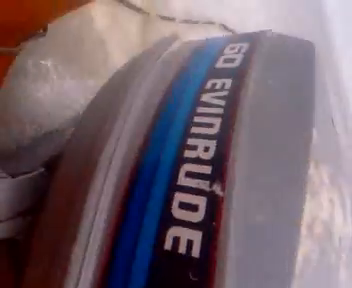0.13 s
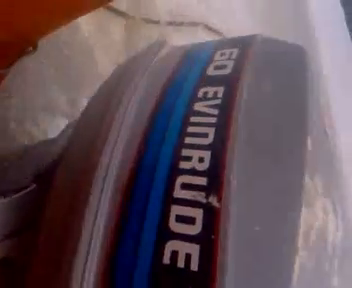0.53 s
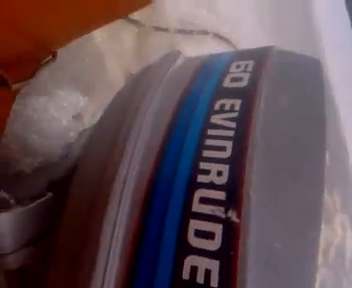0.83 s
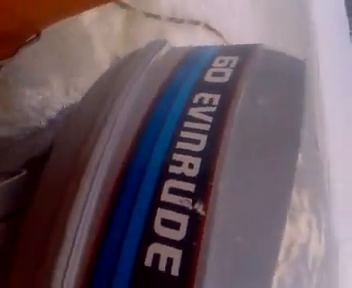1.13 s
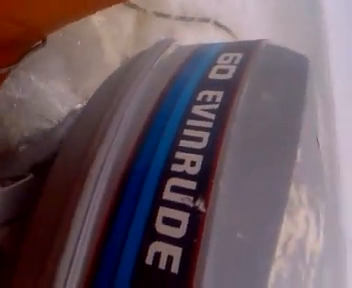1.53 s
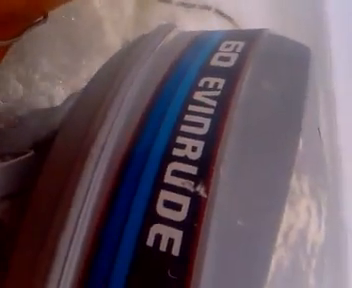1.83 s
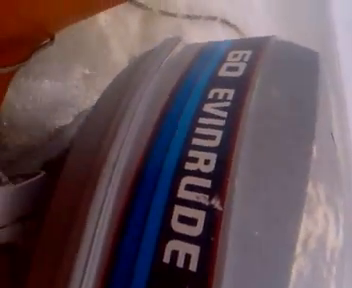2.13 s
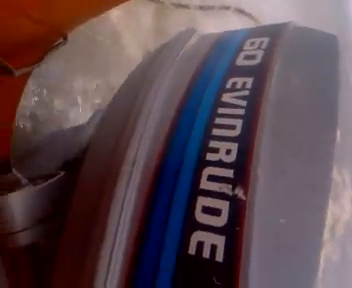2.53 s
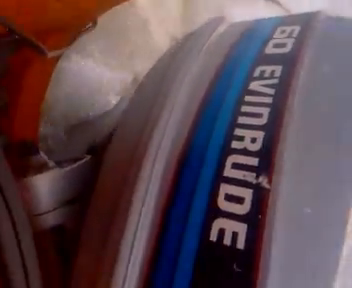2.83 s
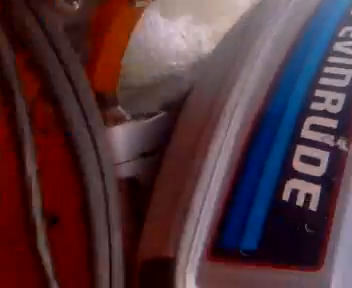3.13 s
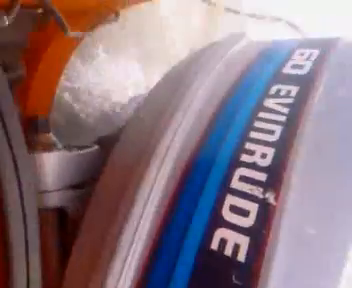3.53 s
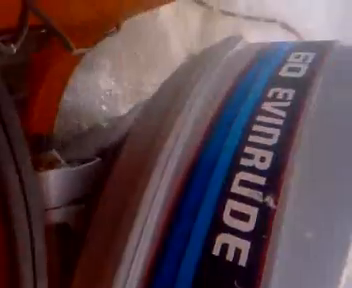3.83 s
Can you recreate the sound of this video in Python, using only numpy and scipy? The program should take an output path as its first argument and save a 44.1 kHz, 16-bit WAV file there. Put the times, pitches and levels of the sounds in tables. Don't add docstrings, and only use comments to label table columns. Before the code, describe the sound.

Close outboard motor with uneven rattling throb, ringing metal and bubbling, hissing water; at about two seconds it surges and howls, then stays loud and rough, through a limited, thin phone microphone.

```python
import sys
import numpy as np
from scipy import signal
from scipy.io import wavfile
from scipy.ndimage import uniform_filter1d, minimum_filter1d

SR = 44100
rng = np.random.default_rng(int(sys.argv[2]) if len(sys.argv) > 2 else 0)


def store_pcm(level_fs):
    pcm = np.round(np.clip(level_fs, -1, 1) * 32767).astype(np.int16)
    wavfile.write(sys.argv[1], SR, np.atleast_2d(pcm).T)


def attenuation_scalar(level_db):
    decades = np.asarray(level_db, float) / 20
    return 10 ** decades


N = 175518

# (time [s], load [dB], intake roar [dB], leg ring [dB], throb depth [0-1])
THROTTLE = [(0, -13.5, -18, -24.5, 0.2), (.17, -21, -18.5, -27.5, 0.5), (.23, -18, -19.5, -15.5, 0.3),
            (.45, -20.5, -20, -22, 0.5), (.8, -20, -20.5, -19, 0.2), (1.08, -22, -20, -23.5, .4),
            (1.2, -23.5, -21, -33.5, 0.3), (1.5, -21, -22.5, -28, 0.5), (1.62, -25.5, -22, -29.5, 0.3),
            (1.9, -22, -20, -29, .4), (2.02, -13.5, -18, -22, .3), (2.2, -11.5, -9, -22, .2),
            (2.4, -10.5, -11.5, -17, 0.1), (2.75, -12.5, -13.5, -17.5, 0.1), (3.12, -15, -16.5, -20.5, .25),
            (3.45, -13, -16, -18, .25), (3.7, -15.5, -18, -18, 0.2), (3.98, -12.5, -20, -20, 0.4)]
# (time [s], change [dB], length [s])
STUMBLES = [(0.372, 2, 0.011), (0.709, 0, 0.032), (1.01, -4, 0.011), (1.016, 4.5, 0.011), (1.174, -3, .025),
            (1.557, 1.5, .025), (1.609, -4.5, 0.035), (1.846, 2, 0.024), (1.975, 1.5, 0.026),
            (2.564, 0, 0.018), (2.721, 2.5, .02), (3.521, 2.5, 0.031), (3.952, 3.5, 0.018)]
# (frequency [Hz], width [Hz], level [dB])
COWL = [(237.3, 23, -6), (292.5, 30, -10), (388.3, 60, -11), (602, 70, -9.5), (745.3, 51, -7),
        (814.5, 36, -1), (926, 60, -9)]
# (frequency [Hz], width [Hz], level [dB])
LEG = [(472.2, 38, -4), (491.5, 35, -0.5)]
# (frequency [Hz], width [Hz], level [dB])
INTAKE = [(1457, 72, -12), (1742.5, 200, 0), (1977, 180, -2), (2171.5, 150, -2.5), (2554, 160, -7),
          (2858, 240, -6), (3132, 230, -7), (3355, 150, -2)]
# (frequency [Hz], width [Hz], level [dB])
HOWL = [(1943, 120, -3), (2146, 120, 0), (2497, 120, -1), (3230, 340, -4)]
# (frequency [Hz], width [Hz], level [dB])
DRONE = [(1758, 130, 0), (1882, 170, -1), (997, 110, -5)]
# (frequency [Hz], level per Hz [dB])
CHURN = [(25, -30), (60, -12.5), (150, -11.5), (230, -4.5), (500, -1.5), (900, -4), (1200, -11.5),
         (2000, -16.5)]
# (frequency [Hz], level per Hz [dB])
SPRAY = [(500, -29.5), (1000, -6), (1500, -1), (2000, -3), (3300, -2), (3600, -6.5), (3900, -16.5),
         (4200, -20)]
# (time [s], click level [dB])
CLIPPED_PEAKS = [
    (2.1546, -40.5),
    (2.2562, -33.5),
    (2.2698, -24),
    (2.2759, -32.5),
    (2.3200, -25.5),
    (2.3220, -36),
    (2.3814, -46),
]


def firings():
    rate_hz, jitter, spread_db, burst_s = 32, 0.25, 2, 0.013
    turns = np.cumsum(rate_hz * np.exp(jitter * drift(12))) / SR
    fired = np.diff(np.floor(turns), prepend=0) * attenuation_scalar(spread_db * rng.standard_normal(N))
    r = np.exp(-2 / (burst_s * SR))
    bursts = signal.lfilter([1], [1, -2 * r, r * r], fired + 1e-18)
    return bursts / bursts.mean()


def throbbing(bursts, throb, share):
    return 1 + np.clip(share * throb, 0, 1) * (bursts - 1)


def stumble_db():
    t = np.arange(N) / SR
    return sum(db * np.exp(-((t - s) / length) ** 2) for s, db, length in STUMBLES)


def cowl(load_db, pulse):
    return attenuation_scalar(-4.5 + load_db) * body(pulse * rng.standard_normal(N), COWL)


def exhaust_leg(ring_db, pulse):
    ring = body(rng.standard_normal(N), LEG)
    envelope = abs(signal.hilbert(ring)) + 0.05
    return attenuation_scalar(-1 + ring_db) * pulse * rms_one(ring / np.sqrt(envelope))


def intake(pulse):
    return attenuation_scalar(-2.5) * body(pulse * rng.standard_normal(N), INTAKE)


def howl():
    peak_s, rise_s, fall_s, peak_db = 2.36, 0.15, 0.25, -13
    drone_db, drone_end_db = -19.5, -23
    t = np.arange(N) / SR - peak_s
    rise = np.exp(-(np.minimum(t, 0) / rise_s) ** 2)
    fall = np.exp(-np.maximum(t, 0) / fall_s)
    peak = attenuation_scalar(peak_db) * fall * body(rng.standard_normal(N), HOWL)
    drone_level = attenuation_scalar(np.interp(t, [0, t[-1]], [drone_db, drone_end_db]))
    drone = drone_level * body(rng.standard_normal(N), DRONE)
    return rise * (peak + drone) * rattle()


def churn(load_db, pulse):
    follows = 0.6
    level_db = load_db.mean() + follows * (load_db - load_db.mean())
    return attenuation_scalar(-4 + level_db) * banded(CHURN, pulse)


def spray(pulse):
    return attenuation_scalar(-2) * banded(SPRAY, pulse)


def rattle():
    return attenuation_scalar(1.35 * drift(90))


def body(drive, resonances):
    wander_db, out = 1.81, 0
    for k, (hz, width, db) in enumerate(resonances):
        r = np.exp(-np.pi * width / SR)
        fed = drive * attenuation_scalar(db + wander_db * drift(16))
        poles = [1, -2 * r * np.cos(2 * np.pi * hz / SR), r * r]
        out = out + (-1) ** k * signal.lfilter([1 - r, 0, r - 1], poles, fed)
    return rms_one(out)


def banded(spectrum, pulse):
    patchy_db, flicker_db = 0.73, 1.8
    hz, db = np.transpose(spectrum)
    edges = np.geomspace(hz[0], hz[-1], int(3 * np.log2(hz[-1] / hz[0])) + 1)
    white = rng.standard_normal((2, N)) * pulse
    out = 0
    for k, (low, high) in enumerate(zip(edges, edges[1:])):
        band_pass = signal.butter(2, [low, high], "band", fs=SR, output="sos")
        band = signal.sosfilt(band_pass, white[k % 2])
        level_db = np.interp(np.log(low * high) / 2, np.log(hz), db)
        out = out + band * attenuation_scalar(level_db + patchy_db * drift(7) + flicker_db * drift(20))
    return rms_one(out)


def drift(rate):
    r = np.exp(-80 * np.pi * rate / SR)
    slow = signal.lfilter([1], [1, -2 * r, r * r], rng.standard_normal(N // 40 + 2002))[2000:]
    return np.interp(np.arange(N) / 40, np.arange(len(slow)), rms_one(slow))


def rms_one(x):
    return x / np.sqrt(np.mean(x ** 2) + 1e-20)


def in_time(rows):
    s, *columns = np.transpose(rows)
    return [np.interp(np.arange(N) / SR, s, c) for c in columns]


def scene():
    load_db, roar_db, ring_db, throb = in_time(THROTTLE)
    bursts, bump_db = firings(), stumble_db()
    water_pulse = throbbing(bursts, throb, 0.5)
    low = cowl(load_db, throbbing(bursts, throb, 0.88)) + churn(load_db, water_pulse)
    leg = exhaust_leg(ring_db, throbbing(bursts, throb, 1.6))
    high = (intake(throbbing(bursts, throb, 0.72)) + spray(water_pulse)) * rattle()
    engine = attenuation_scalar(bump_db) * (low + leg)
    hiss = attenuation_scalar(roar_db + 0.4 * bump_db) * high
    return (engine + hiss + howl())[None]


def phone_voice(x):
    frame, pulses, leftover, sharpen = 40, 10, 0.56, 0.1
    post_zeros, post_poles = 0.77, 0.81
    x = np.pad(x, (120, 240))
    out, post = np.zeros(len(x)), np.zeros(len(x))
    state, lags = np.zeros(10), np.arange(11)
    for i in range(120, len(x) - 160, frame):
        if (i - 120) % (2 * frame) == 0:
            piece = x[i - 80:i + 160] * np.hamming(240)
            r = np.correlate(piece, piece, "full")[239:250]
            r = r * np.exp(-.5 * (.047 * lags) ** 2) + 1e-9 * (lags == 0)
            matrix = r[abs(lags[:10, None] - lags[:10])] + 1e-4 * r[0] * np.eye(10)
            a = np.r_[1, -np.linalg.solve(matrix, r[1:])]
        rest = np.convolve(x[i - 10:i + frame], a, "valid")
        size = abs(rest)
        top = size >= np.sort(size)[-pulses]
        pulse = np.sign(rest) * ((1 - sharpen) * size[top].mean() + sharpen * size)
        drive = np.where(top, pulse, leftover * rest)
        drive = drive * np.sqrt(np.sum(rest ** 2) / (np.sum(drive ** 2) + 1e-20))
        past = signal.lfiltic([1], a, out[i - 10:i][::-1])
        out[i:i + frame] = signal.lfilter([1], a, drive, zi=past)[0]
        zeros, poles = a * post_zeros ** lags, a * post_poles ** lags
        post[i:i + frame], state = signal.lfilter(zeros, poles, out[i:i + frame], zi=state)
    return post[120:] * np.std(out) / np.std(post)


def telephone(x):
    phone_sr, limit, ceiling = 8000, 0.9, 0.72
    phone = signal.resample_poly(x, 80, 441)
    phone = phone_voice(limit * np.tanh(phone / limit))
    phone = signal.sosfilt(signal.butter(2, 48.7, "high", fs=phone_sr, output="sos"), phone)
    phone = np.clip(phone, -ceiling, ceiling)
    taps = signal.firwin(32 * 441 + 1, 4002, window=("kaiser", 9), fs=phone_sr * 441)
    return signal.resample_poly(phone, 441, 80, window=taps)[:N]


def peak_limiter(x):
    room = minimum_filter1d(.95 / np.maximum(abs(x), .95), size=201)
    return x * uniform_filter1d(uniform_filter1d(room, size=100), size=100)


def clip_clicks():
    ticks = np.zeros(N)
    for s, db in CLIPPED_PEAKS:
        ticks[int(s * SR):int(s * SR) + 2] = attenuation_scalar(db + 6)
    return ticks


def top_cut(x):
    return signal.sosfilt(signal.butter(12, 15870, fs=SR, output="sos"), x)


def record(dry):
    x = peak_limiter(telephone(dry[0]))
    x = x * np.minimum(1, (N - np.arange(N)) / 12)
    mix = np.clip(x + clip_clicks(), -1, 1)[None]
    return top_cut(mix)


dry = scene()
out = record(dry)
store_pcm(out)
```